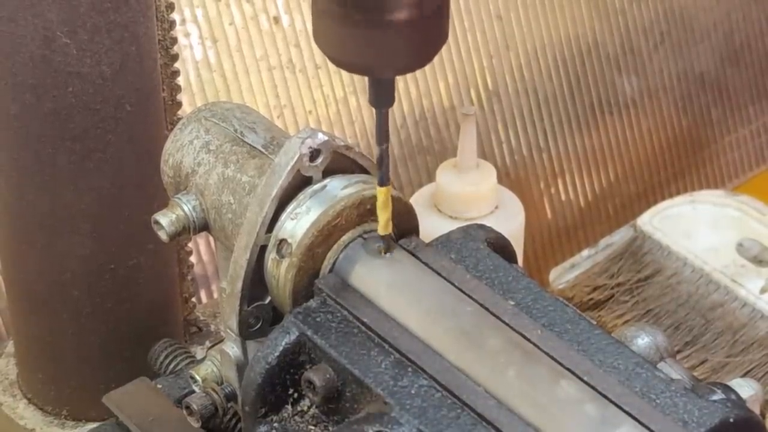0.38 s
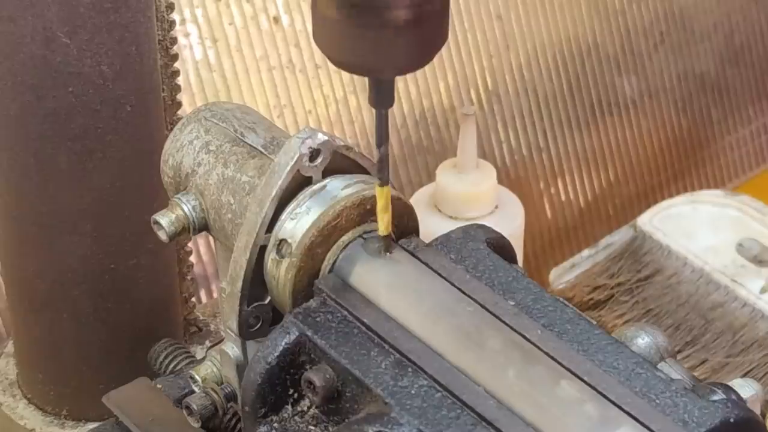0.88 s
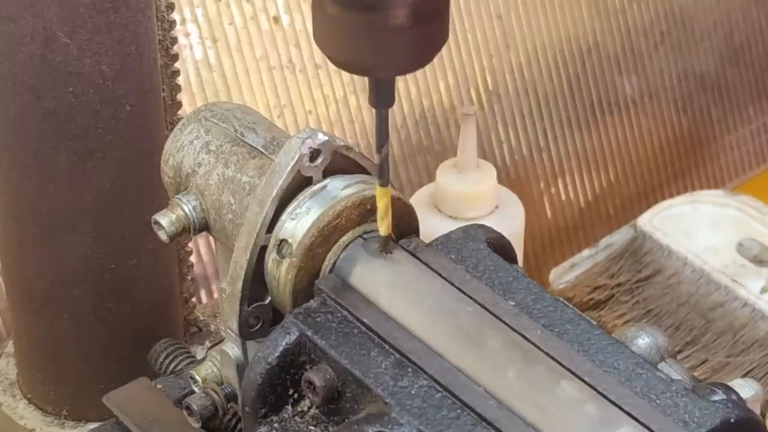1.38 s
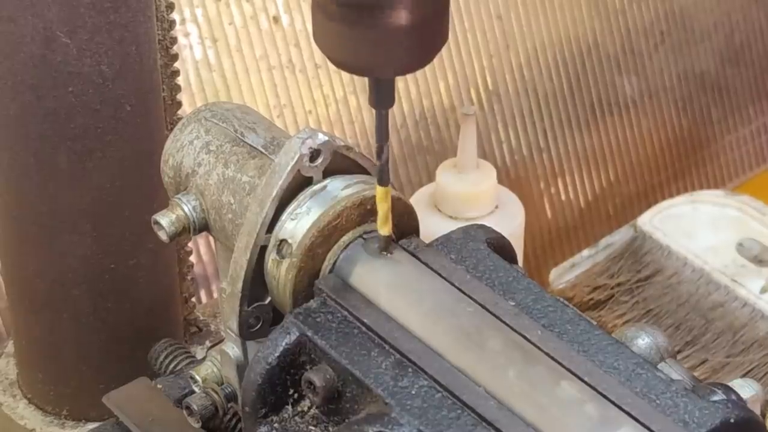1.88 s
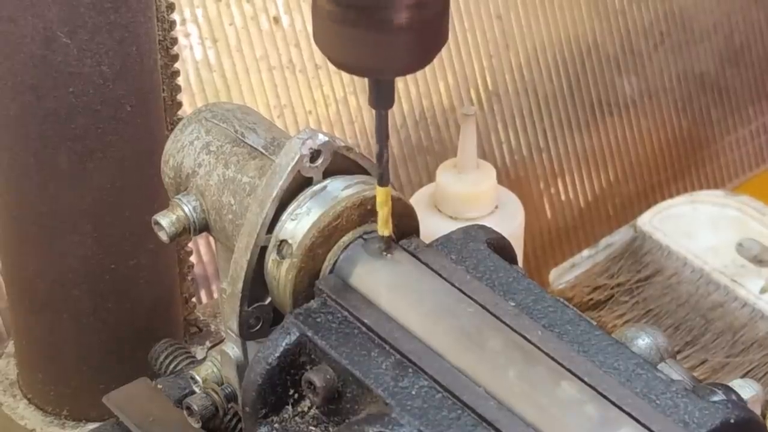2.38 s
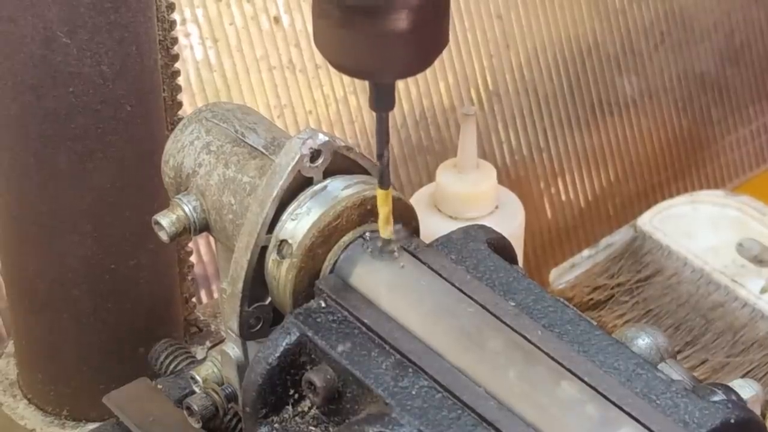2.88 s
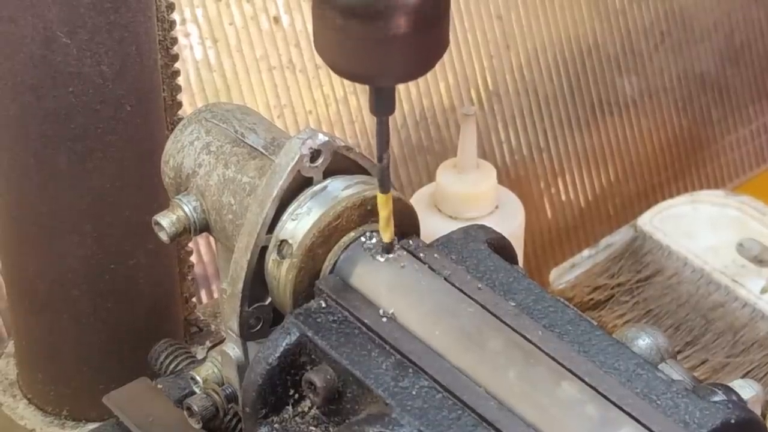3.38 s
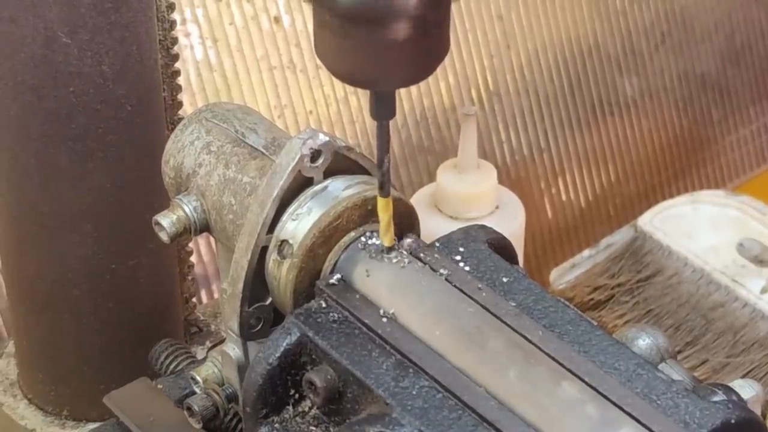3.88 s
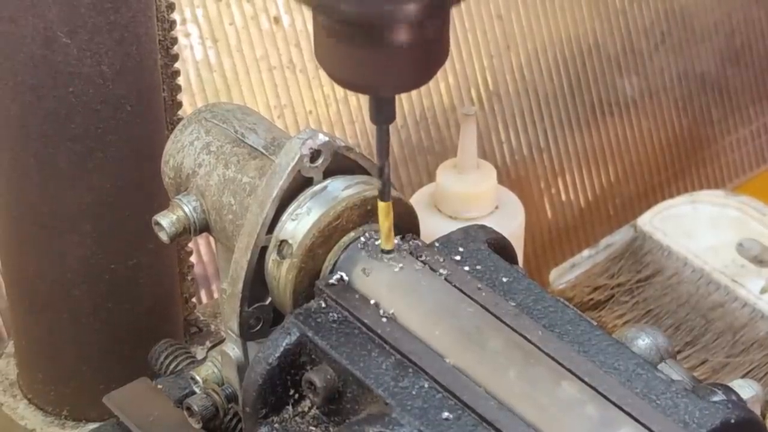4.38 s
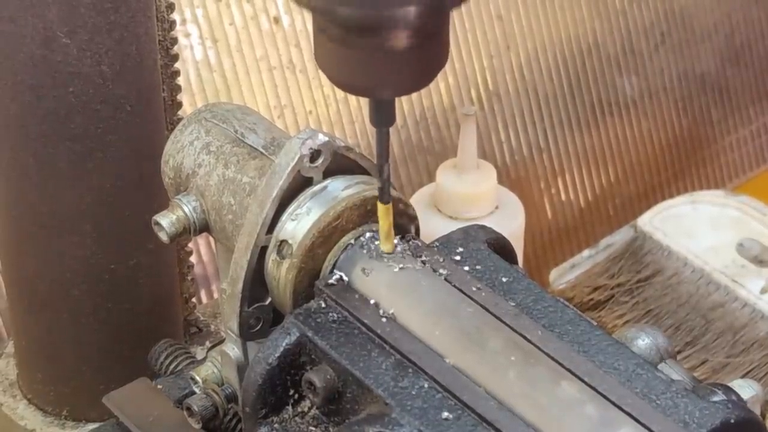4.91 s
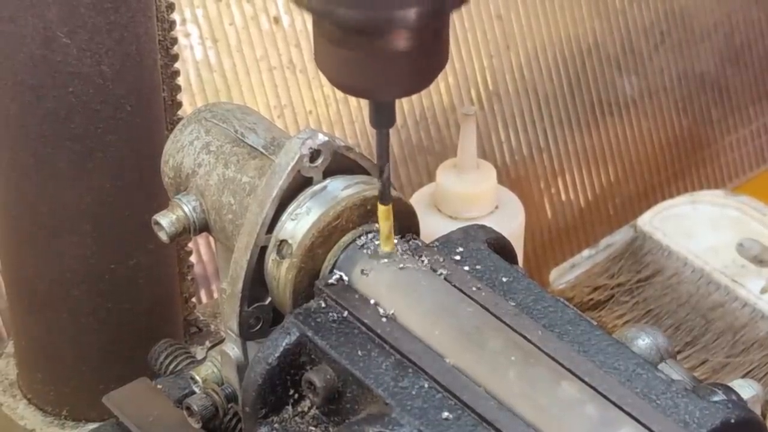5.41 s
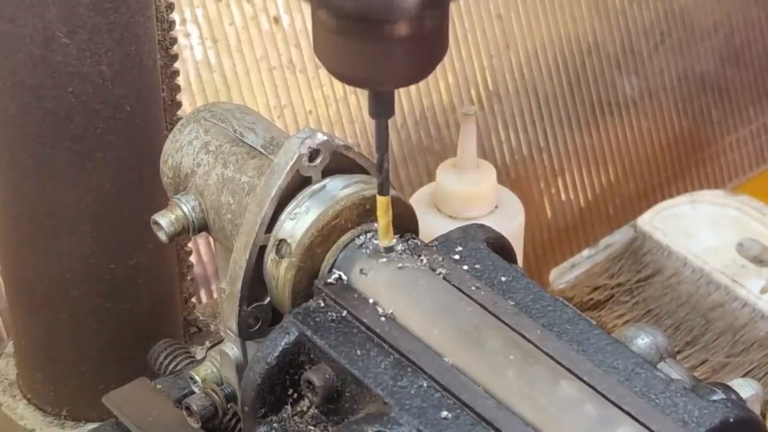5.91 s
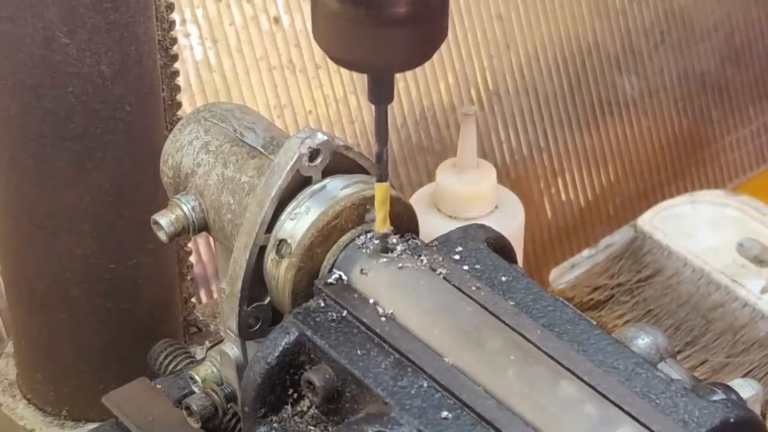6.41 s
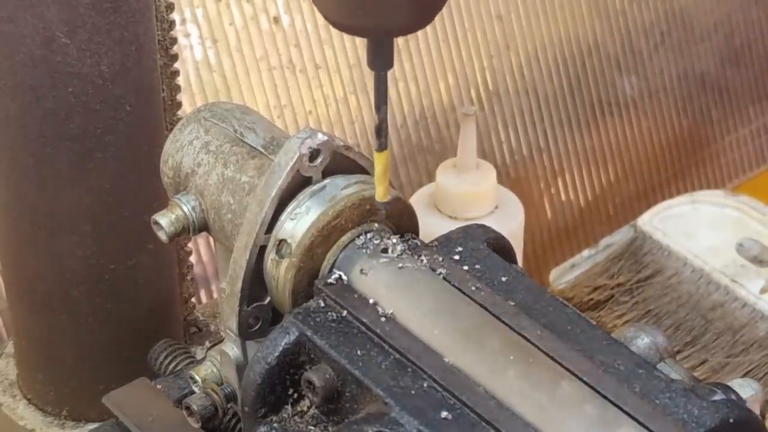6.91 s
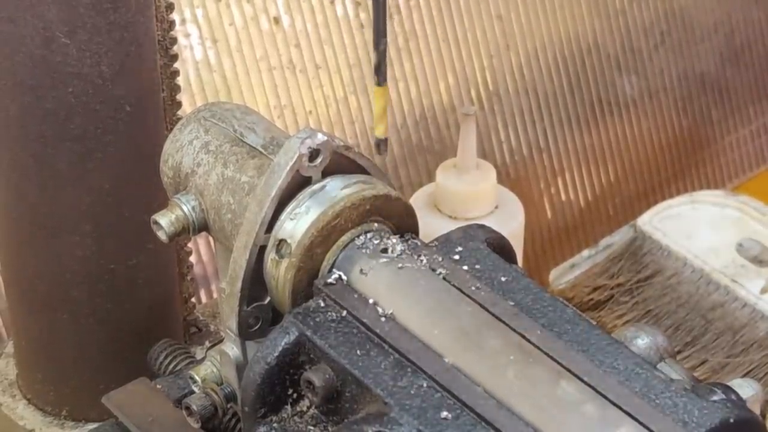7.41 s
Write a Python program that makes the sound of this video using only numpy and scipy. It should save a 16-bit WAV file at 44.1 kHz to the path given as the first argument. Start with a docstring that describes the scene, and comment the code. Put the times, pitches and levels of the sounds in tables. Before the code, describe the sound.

A drill press runs at normal speed, humming and clattering loosely while chips tick. A hard cut turns it into high, thin, sped-up noise, whining and hissing as the bit scrapes and catches in metal, with brief dull bumps and a bright snap. Another hard cut stops everything; faint insects, distant traffic and small rustles fade in. The machine is close and dry, the outdoor air distant.

```python
"""A bench drill press runs in an open workshop: mains hum, a rumbling housing, spindle knocks, ticking chips.
Then the same machine plays eight times too fast, hum turned to whine and rumble to hiss, rotor slots whining
high, while the bit snatches and scrapes and a chip snaps. A hard cut to silence follows; the quiet yard with
its insects, already under the slow part, fades back in with soft rustles.
Body sounds are noise shaped by resonances, tones are wavering sines, blows and ticks are damped."""
import sys
import numpy as np
from scipy import signal
from scipy.fft import rfft, irfft, next_fast_len
from scipy.io import wavfile
from scipy.ndimage import uniform_filter1d, map_coordinates

SR = 44100
rng = np.random.default_rng(int(sys.argv[2]) if len(sys.argv) > 2 else 0)


def file_out(sig):
    """Save sig as 16-bit WAV at sys.argv[1]."""
    # one column per channel
    cols = np.atleast_2d(sig).T
    # limit, then scale
    lim = np.clip(cols, -1, 1)
    pcm = np.round(lim * 32767).astype(np.int16)
    wavfile.write(sys.argv[1], SR, pcm)


def to_linear_factor(level_db):
    """Convert decibel levels (scalar or array-like) to linear amplitude factors."""
    exponent = np.asarray(level_db, float) / 20
    return 10 ** exponent


N = 332028
T = np.arange(N) / SR

FAST = 8  # speed ratio of the fast part
CUT_IN_S, CUT_OUT_S = 2.4335, 5.6  # fast part starts, stops

# Left-right likeness in the fast part. Each row: frequency in Hz, likeness as a share.
FAST_ALIKE = [(60, 0.65), (130, 0.95), (290, 0.93), (640, 0.97), (1410, 0.99), (3100, 0.86), (6820, 0.64),
              (8600, .74), (11000, 0.82), (15000, 0.85)]
# Left-right likeness of the yard. Each row: frequency in Hz, likeness as a share.
YARD_ALIKE = [(60, 1), (240, 0.88), (950, 0.2), (3770, 0.25), (15000, 1)]


def unit(x):
    """Scaled to rms 1."""
    return x / np.sqrt(np.mean(x ** 2) + 1e-20)


def along(points, hz):
    """(Hz, value) points interpolated on a log frequency axis."""
    f, v = np.transpose(points)
    return np.interp(np.log(hz + 1), np.log(f + 1), v)


def curves(rows):
    """One value per sample for each column after the time."""
    s, *cols = np.transpose(rows)
    return [np.interp(T, s, c) for c in cols]


def wobble(rate_hz):
    """A smooth random curve, rate_hz knots a second."""
    coarse = T[::16]
    knots = rng.standard_normal(int(N * rate_hz / SR) + 4)
    return np.interp(T, coarse, map_coordinates(knots, [coarse * rate_hz]))


def filtered(x, response):
    """x times a response of frequency."""
    m = next_fast_len(N + 8192)
    return irfft(rfft(x, m) * response(np.fft.rfftfreq(m, 1 / SR)), m)[..., :N]


def above(x, low_hz):
    """x with its bass rolled off."""
    return filtered(x, lambda f: 1 / np.sqrt(1 + (low_hz / (f + 1)) ** 4))


def span(start_s, end_s, edge_s):
    """1 between two times, with ramped edges centred on them."""
    return np.clip(np.minimum(T - start_s, end_s - T) / edge_s + .5, 0, 1)


def pair(alike, patchy_db=1.5, grit=0):
    """Stereo noise in patches of random gain plus sharp grit, its sides alike by the given share."""
    z = signal.stft(rng.standard_normal((2, N + 512)), nperseg=256)[2]
    field = uniform_filter1d(rng.standard_normal(z.shape[1:]), size=5, axis=0)
    field = uniform_filter1d(field, size=12, axis=1)
    noise = signal.istft(z * to_linear_factor(patchy_db * unit(field)), nperseg=256)[1][:, :N]
    noise = noise + grit * rng.uniform(-1.5, 1.5, (2, N))
    turn = lambda hz: np.arccos(np.clip(along(alike, hz), -1, 1)) / 2
    mid, side = filtered(noise, lambda hz: np.array([np.cos(turn(hz)), np.sin(turn(hz))]))
    return np.array([mid + side, mid - side])


def bursts(rows, t60_s):
    """Envelope of (s, dB) blows: 1 ms rise, exponential end."""
    starts, t = np.zeros(N), np.arange(SR // 4) / SR
    for s, db in rows:
        starts[round(s * SR)] = to_linear_factor(db)
    return signal.fftconvolve(starts, to_linear_factor(-60 * t / t60_s) * (1 - np.exp(-t / .001)))[:N]


def narrow(hz, waver_hz, waver_db, drift_turns):
    """An unsteady tone: a sine whose level wanders and whose phase drifts by some turns."""
    turns = hz * T + drift_turns * wobble(waver_hz) + rng.random()
    return np.sqrt(2) * to_linear_factor(waver_db * wobble(waver_hz)) * np.sin(2 * np.pi * turns)


def rings(rows, rough, rise_s=0):
    """Short damped notes with roughened phase from (s, dB, Hz, t60 s) rows."""
    out, t = np.zeros(N + SR), np.arange(SR // 4) / SR
    for s, db, hz, t60_s in rows:
        phase = 2 * np.pi * hz * t + rough * np.cumsum(rng.standard_normal(len(t)))
        rise = 1 - np.exp(-t / (rise_s + 1 / hz))
        out[round(s * SR):][:len(t)] += to_linear_factor(db - 60 * t / t60_s) * rise * np.sin(phase)
    return out[:N]


def lifted():
    """Gain of rattle and scrape: they drop when the bit leaves the metal."""
    return to_linear_factor(-12 * span(5.545, 9, .03))


def press(speed, spectrum, run, split_hz, alike, blows, chatter_db, slack_turns, shaking, lead_s,
          tones_db, jolt_db):
    """Jolted, resonant housing with shaft tones; speed multiplies the frequencies and rates of its parts."""
    # Housing resonances and dips at true speed. Each row: centre in Hz.
    housing_hz = [145, 165, 240, 256, 305, 340, 376, 398, 417, 426, 445, 592, 690, 735, 802, 855, 957, 1042,
                  1155, 1246, 1320, 1345, 1400, 1560, 1850, 1930, 3680]
    # The same resonances in order. Each row: width in Hz, height over the rumble in dB.
    housing = [(18.5, 4.5), (12, 2), (17, 1.5), (6, -0.5), (25, 5), (10, -4), (24.8, 2), (11.8, 6.5),
               (8, -7.5), (7.9, 7.5), (18, 6.5), (16, 7.5), (15, 4), (15, 3), (26, 6.5), (14, -3.5),
               (22, 9), (16, 4.5), (25, 2), (33, 6), (17, 9.5), (23, -13), (40, -3), (60, 5), (60, -3.5),
               (59.7, -5), (320, -14.5)]
    # Turning parts at true speed. Each row: turns per second, shake depth 0-1 before shaking.
    shafts = [(2.72, 0.17), (5.87, 0.05), (11.75, 0.24), (23.5, 0.22), (32.5, 0.18)]
    # Colour of a blow at true speed, before the housing. Each row: frequency in Hz, level in dB.
    knock_colour = [(150, -24.5), (400, 1.5), (1000, 8), (2300, 0), (3200, -11), (5000, -25.5),
                    (9000, -42.5)]
    # Mains and shaft tones at fast pitch. Each row: frequency in Hz, level in dB before tones_db.
    tone_rows = [(274.6, -67.5), (296.3, -62.5), (447, -64), (498, -59), (519.7, -60), (541.4, -65),
                 (705.2, -63), (816.2, -62), (959, -51), (1030, -66.5), (1197, -55.5), (1598, -60.5),
                 (1822, -57.5), (1878.5, -49.5), (1917.9, -38.5), (1955, -53.5), (2877, -53.5),
                 (3836, -61.5), (5516.5, -56.5)]
    # Stereo lean at true speed. Each row: frequency in Hz, left over right in dB.
    lean = [(60, 0.5), (240, 0), (950, 2.5), (3770, 1.5), (15000, 0)]
    jolts_per_s, jolt_spread_db = 90, 1.5  # rate at true speed
    throb_depth, throb_turn, throb_top_hz = .45, .62, 85  # exponent depth, belt phase in turns, true speed
    spindle_hz, first_turn_s = 9.3, .015  # rate at true speed
    waver_share = .011  # waver rate over pitch
    dip_db, dip_hz = 8.5, 11  # dB per unit over threshold, knot rate at true speed

    def ring(f):
        peaks = zip(housing_hz, housing)
        return to_linear_factor(sum(db / (1 + (2 * (f / speed - c) / w) ** 2) for c, (w, db) in peaks))

    body = lambda f: to_linear_factor(along(spectrum, f)) * ring(f)
    high = lambda f: 1 / np.sqrt(1 + (split_hz / (f + 1)) ** 6)
    rumble_db, rattle_db = curves(run)

    # play in the bearings: sharp jolts at random moments excite the whole body
    chance = jolts_per_s * speed / SR
    jolts = (rng.random(N) < chance) * to_linear_factor(jolt_db + jolt_spread_db * rng.standard_normal(N))
    jolts = jolts / np.sqrt(chance)
    rumble = pair(alike, patchy_db=1.62, grit=jolts)
    rumble = unit(filtered(rumble, lambda f: body(f) * np.sqrt(1 - high(f) ** 2)))

    # the lowest rumble throbs once a belt turn
    belt = np.exp(throb_depth * (np.cos(2 * np.pi * (shafts[0][0] * speed * T + throb_turn)) - .5))
    rumble = rumble + (belt - 1) * filtered(rumble, lambda f: 1 / (1 + (f / speed / throb_top_hz) ** 6))

    # belt, pulleys and motor shaft each shake the loose parts once a turn
    shake = sum(depth * np.cos(2 * np.pi * (turn_hz * speed * T + rng.random()))
                for turn_hz, depth in shafts)
    shake = np.exp(shaking * shake)

    # a light knock of random strength on every spindle turn
    turn_s = 1 / (spindle_hz * speed)
    times = np.arange(first_turn_s, N / SR, turn_s)
    times = np.clip(times + slack_turns * rng.standard_normal(len(times)) * turn_s, 0, T[-1])
    strengths = to_linear_factor(chatter_db + 5.1 * rng.standard_normal(len(times)))
    light = np.bincount((times * SR).astype(int), strengths, N)
    light = signal.lfilter([1], [1, -np.exp(-speed * np.log(1000) / (.1 * SR))], light)  # t60 0.1 s / speed
    rattle = pair(alike, grit=jolts / (1 + light)) * (shake + light)
    rattle = unit(filtered(rattle, lambda f: body(f) * high(f)))

    struck = unit(filtered(pair(alike), lambda f: to_linear_factor(along(knock_colour, f / speed)) * ring(f)))
    ratio = speed / FAST
    tones = sum(to_linear_factor(db) * narrow(hz * ratio, waver_share * hz * ratio, waver_db=1.4, drift_turns=0.083)
                for hz, db in tone_rows)
    # the tones dip briefly
    tones = to_linear_factor(tones_db) * tones * to_linear_factor(-dip_db * np.clip(wobble(dip_hz * speed) - .7, 0, None))

    sound = to_linear_factor(rumble_db) * rumble * np.sqrt(shake) + to_linear_factor(rattle_db) * lifted() * rattle
    sound = sound + blows * struck + tones
    side = np.array([[.5], [-.5]])
    delay = lambda f: np.exp(2j * np.pi * f * lead_s * side)  # left leads
    return filtered(sound, lambda f: to_linear_factor(along(lean, f / speed) * side) * delay(f))


def slow_press():
    """The press at true speed: rumble, rattle, hum, and spindle knocks as decaying noise."""
    # Rumble colour. Each row: frequency in Hz, level in dB per Hz before the housing.
    rumble_colour = [(18, -43), (30, -25), (87, -27), (115, -12), (206, -5.5), (239, -2), (334, -11),
                     (498, -13), (589, -11), (1420, -24.5), (1650, -25.5), (1990, -33), (3020, -38.5),
                     (4500, -45.5), (5850, -90), (9900, -120)]
    # Course of the run. Each row: time in seconds, rumble in dB, rattle in dB before shaking.
    run = [(0, -38, -43.5), (1.6, -37.5, -42), (2.0, -36, -41), (2.43, -36, -42)]
    # Left-right likeness. Each row: frequency in Hz, likeness as a signed share.
    alike = [(60, 0.8), (130, 0.99), (290, 0.91), (640, 0.74), (1410, -0.96), (3100, -0.027), (6820, 0.92),
             (15000, 0.94)]
    # Spindle knocks. Each row: start in seconds, level in dB.
    knock_rows = [(0.134, -35.5), (0.232, -37), (0.304, -38.5), (0.346, -33), (0.4415, -27), (0.559, -40),
                  (0.642, -34.5), (0.725, -36), (0.779, -30), (0.873, -32.5), (0.949, -39), (1.083, -30.5),
                  (1.149, -31.5), (1.233, -35.5), (1.303, -31), (1.367, -38.5), (1.516, -30.5),
                  (1.615, -34.5), (1.741, -30), (1.85, -30), (1.945, -30), (2.189, -32), (2.279, -32),
                  (2.377, -37.5)]
    return press(1, rumble_colour, run, 763, alike, bursts(knock_rows, t60_s=0.077), chatter_db=-7.5,
                 slack_turns=.03, shaking=1.01, lead_s=0.000094, tones_db=-0.36, jolt_db=-7.5)


def whine():
    """The rotor slots sing in two close families of rough tones."""
    # Slot tones. Each row: frequency in Hz, level in dB rms before waver.
    slot_tones = [(1637, -61), (1696, -64), (1755, -64), (1879, -67), (2955, -70.5), (2978, -70.5),
                  (3079, -71.5), (3102, -70)]
    return sum(to_linear_factor(db) * narrow(hz, 55, waver_db=3.5, drift_turns=0.14) for hz, db in slot_tones)


def yard():
    """Still air, pulsing insects and far traffic as shaped noise, plus one faint steady tone."""
    # Air colour. Each row: frequency in Hz, relative level in dB per Hz.
    air_colour = [(90, -41.5), (130, 0), (300, 2.5), (800, -7), (1700, -6), (2800, -7.5), (3650, -13),
                  (4400, -10), (5300, -14.5), (6200, -7), (7200, -6.5), (8000, -9.5), (10000, -19),
                  (15800, -24)]
    # Insect song colour. Each row: frequency in Hz, relative level in dB.
    song_colour = [(7800, -35), (8300, -10.5), (8600, -5), (8900, -11.5), (10800, -11), (12000, -4),
                   (13300, -5.5), (13600, -7.5), (15700, -20)]
    # Traffic colour. Each row: frequency in Hz, relative level in dB per Hz.
    traffic_colour = [(12, -40), (20, -9), (48, -6), (70, -1), (130, -15.5), (170, -48), (290, -120)]
    # Course of the yard. Each row: time in seconds, air in dB, insects in dB, traffic in dB.
    course = [(0, -60, -58.5, -70), (1.1, -63, -64.5, -65), (1.7, -62.5, -70, -68), (5.8, -63, -69.5, -78),
              (5.97, -65.5, -67, -70.5), (6.25, -64.5, -62, -71), (6.5, -65, -66.5, -72),
              (7.0, -64, -62.5, -66.5), (7.5, -63, -64, -62.5)]
    # Nearer insects join in. Each row: start in seconds, end in seconds, level in dB.
    joiners = [(6.078, 6.501, -64.5), (7.047, 7.201, -61), (7.36, 7.487, -66.5)]
    air_db, insects_db, traffic_db = curves(course)
    air = unit(filtered(pair(YARD_ALIKE), lambda f: to_linear_factor(along(air_colour, f))))
    song = pair(YARD_ALIKE) * to_linear_factor(0.65 * wobble(110))
    song = unit(filtered(song, lambda f: to_linear_factor(along(song_colour, f)) * (f > 7000)))
    traffic = unit(filtered(pair(YARD_ALIKE), lambda f: to_linear_factor(along(traffic_colour, f))))
    far_tone = to_linear_factor(-14.5) * narrow(660, 8, waver_db=1.5, drift_turns=.1)  # dB over the air
    nearer = sum(to_linear_factor(db) * span(start, end, .08) for start, end, db in joiners)
    chorus = np.hypot(to_linear_factor(insects_db), nearer)
    return to_linear_factor(air_db) * (air + far_tone) + chorus * song + to_linear_factor(traffic_db) * traffic


def ticks():
    """Chips tick: short damped notes."""
    # Ticks. Each row: start in seconds, level in dB, frequency in Hz.
    tick_rows = [(0.1501, -50.5, 7160), (0.2773, -50.5, 7200), (1.6117, -53, 5260), (1.773, -49, 4400),
                 (1.9465, -54, 4400), (2.119, -45.5, 5300), (2.176, -52.5, 4440), (2.271, -48.5, 4000),
                 (2.37, -52.5, 4130)]
    return rings([(*row, 0.059) for row in tick_rows], rough=.3, rise_s=.002)  # t60 in s


def fast_press():
    """The press at eight times speed: hiss, whine, and snatches of the bit as decaying noise."""
    # Hiss colour. Each row: frequency in Hz, level in dB per Hz before the housing.
    hiss_colour = [(140, -40), (230, -18.5), (467, -14), (557, -6.5), (620, -13), (800, -11), (948, -9.5),
                   (1700, -5.5), (1890, -2), (2260, -9), (4040, -13), (4740, -10), (6880, -15.5),
                   (10200, -20), (15800, -20)]
    # Course of the run. Each row: time in seconds, rumble in dB, rattle in dB before shaking and lift.
    run = [(2.44, -37.5, -39.5), (2.95, -39.5, -38), (3.0, -37.5, -37), (3.15, -38, -40),
           (3.24, -32.5, -34.5), (3.28, -37, -39.5), (3.42, -36.5, -36), (3.95, -41.5, -39),
           (4.02, -38.5, -35.5), (4.67, -41, -34.5), (4.74, -41.5, -37), (4.85, -40.5, -35),
           (5.6, -41.5, -40)]
    # The bit snatches. Each row: start in seconds, level in dB.
    snatch_rows = [(2.4445, -34), (2.749, -24), (2.8025, -30), (2.9921, -18.5), (3.004, -20), (3.11, -23),
                   (3.1834, -24), (3.3217, -22), (3.3633, -27), (3.4017, -22), (3.4564, -18), (3.4865, -23),
                   (3.6794, -22.5), (3.775, -22), (3.91, -24), (4.4443, -23.5), (4.5466, -26), (4.567, -23),
                   (4.588, -25), (4.6513, -20.5), (4.736, -25), (4.8329, -25.5), (4.877, -28),
                   (5.0454, -25), (5.121, -28), (5.163, -19.5), (5.525, -23), (5.5787, -28.5)]
    return press(FAST, hiss_colour, run, 4400, FAST_ALIKE, bursts(snatch_rows, t60_s=0.014),
                 chatter_db=-2.5, slack_turns=0.26, shaking=0.96, lead_s=0, tones_db=0.24, jolt_db=-7)


def fast_whine_and_swells():
    """The rotor slots whine at eight times their pitch; other bands swell as the bit cuts: wavering sines."""
    # Slot whine (above 13 kHz) and swelling bands. Each row: start in seconds, end in seconds,
    # frequency in Hz, waver rate in Hz, level in dB rms before waver and lean.
    tone_rows = [(2.44, 3.25, 13561, 12, -60), (2.5, 3.25, 13076, 12, -64), (4.17, 4.82, 13997, 12, -56),
                 (4.25, 4.75, 13760, 12, -60), (4.15, 5.48, 13525, 12, -59.5),
                 (2.973, 3.47, 10040, 210, -58), (4.725, 5.53, 9880, 200, -50.5),
                 (3.976, 4.752, 4697, 240, -46.5), (4.05, 4.76, 3130, 420, -47),
                 (5.15, 5.53, 3134, 420, -45.5)]
    return sum(to_linear_factor(db) * span(start, end, .12) * narrow(hz, waver_hz, waver_db=4, drift_turns=.3)
               for start, end, hz, waver_hz, db in tone_rows)


def scrape():
    """The bit rubs in the hole: flickering coloured noise, harder for a moment where it binds."""
    # Course of the rubbing. Each row: time in seconds, level in dB before lift and lean.
    course = [(2.95, -39.5), (3.08, -37.5), (3.9, -52.5), (4.4, -49.5), (4.9, -38), (5.1, -44), (5.6, -39)]
    # Scrape colour. Each row: frequency in Hz, relative level in dB.
    colour = [(6000, -23), (7500, -8.5), (8500, 0), (9900, -1), (11000, -6.5), (14000, -18.5)]
    # It binds. Each row: peak time in seconds, peak level in dB before lift and lean.
    bind_rows = [(2.99, -41), (4.45, -38), (4.57, -39), (5.2, -37.5), (5.322, -33), (5.35, -33.5)]
    bind_s = .03
    grit = pair(FAST_ALIKE, patchy_db=3) * to_linear_factor(3 * wobble(150))
    binds = sum(to_linear_factor(db) * np.exp(-np.abs(T - s) / bind_s) for s, db in bind_rows)
    level = np.hypot(to_linear_factor(curves(course)[0]), binds) * lifted()
    rubbing = level * unit(filtered(grit, lambda f: to_linear_factor(along(colour, f))))
    return rubbing * span(course[0][0], 6, 0.081)


def drone():
    """A far engine: sine orders of a gliding firing rate."""
    # Engine course. Each row: time in seconds, third order in Hz, third order in dB, sixth order in dB.
    course = [(3.05, 553.2, -62, -54), (3.19, 561.9, -40.5, -48), (3.222, 561.8, -36, -41.5),
              (3.288, 562.9, -47, -38.5), (3.484, 561.2, -44.5, -62), (3.538, 562.6, -50, -45.5),
              (4.1, 560.8, -56.5, -86)]
    # Other orders. Each row: multiple of the firing rate, level over the third in dB.
    orders = [(2, -11), (3, 1), (4, -16), (7, -10.5)]
    third_hz, third_db, sixth_db = curves(course)
    firing = 2 * np.pi * np.cumsum(third_hz / 3) / SR
    engine = sum(to_linear_factor(third_db + db) * np.sin(order * firing) for order, db in orders)
    engine = engine + to_linear_factor(sixth_db) * np.sin(6 * firing)
    return np.sqrt(2) * engine * span(course[0][0], course[-1][0], 0.16)


def bumps():
    """Dull bumps: low damped notes."""
    # Bumps. Each row: start in seconds, level in dB, frequency in Hz, t60 in seconds.
    bump_rows = [(4.105, -37, 220, 0.14), (4.125, -47.5, 160, 0.2), (4.945, -38, 165, 0.21),
                 (5.074, -44, 150, 0.11), (5.175, -52, 233, 0.095), (5.312, -47, 122, 0.086)]
    return rings(bump_rows, rough=0.08)


def snaps():
    """A chip breaks in four snaps, each ringing the vice in damped modes."""
    # Snaps. Each row: start in seconds, gain in dB.
    snap_rows = [(4.691, -7.5), (4.6936, 0.5), (4.7026, -8.5), (4.7145, -9.5)]
    # Vice modes. Each row: frequency in Hz, level in dB before snap gain, t60 in seconds.
    modes = [(1145, -21, 0.033), (3380, -19, 0.035), (4770, -12, 0.017), (5375, -7.5, 0.015),
             (7920, -15.5, 0.018), (10010, -5.5, .015), (10560, -8.5, 0.011), (11760, -14.5, .015)]
    rows = [(s, db + gain_db, hz, t60_s) for s, gain_db in snap_rows for hz, db, t60_s in modes]
    return above(rings(rows, rough=.22, rise_s=0.0026), 630)


def rustles():
    """Soft rustles in the quiet: coloured noise that rises, holds and dies."""
    # Rustles. Each row: start in seconds, rise in seconds, length in seconds,
    # level in dB rms before the envelope, pitch as a multiple of the colour.
    rustle_rows = [(5.78, 0.065, .36, -67.5, 1.6), (6.0, 0.089, 0.27, -70, 1.02),
                   (7.059, .008, 0.081, -57, 1.05)]
    # Rustle colour at pitch 1. Each row: frequency in Hz, relative level in dB.
    colour = [(500, -30), (850, -2.5), (1200, -6), (1750, 5.5), (2600, -6), (4000, -13.5), (8000, -26.5)]
    noise = pair(YARD_ALIKE, patchy_db=2.5)
    out = np.zeros((2, N))
    for start_s, rise_s, length_s, db, pitch in rustle_rows:
        t = np.clip(T - start_s, 0, None)
        envelope = (1 - np.exp(-t / rise_s)) * np.exp(-(t / length_s) ** 4 / 2)
        out += to_linear_factor(db) * envelope * unit(filtered(noise, lambda f: to_linear_factor(along(colour, f / pitch))))
    return out


def scene():
    """Slow part over the yard, hard cut to the fast part, hard cut to a gap, then the yard fades in."""
    outdoors = yard()
    slow = slow_press() + whine() + ticks() + outdoors
    lean_db = 1.5  # left over right
    leaning = to_linear_factor([[lean_db / 2], [-lean_db / 2]]) * (fast_whine_and_swells() + scrape())
    fast = fast_press() + leaning + drone() + bumps() + snaps()
    fast = above(fast, 110)  # the microphone's bass roll-off, moved up in this part
    quiet = (outdoors + rustles()) * span(5.76, 9, .14) ** 2
    return slow * span(-1, CUT_IN_S, 0.0019) + fast * span(CUT_IN_S, CUT_OUT_S, 0.00074) + quiet


def band_limit(x):
    """A steep low-pass at the top of the band."""
    return signal.sosfilt(signal.butter(12, 16540, fs=SR, output="sos"), x)


def record(dry):
    """Cuts all from 15.8 kHz up."""
    mix = filtered(dry, lambda hz: hz < 15800)
    return band_limit(mix)


dry = scene()
out = record(dry)
file_out(out)
```